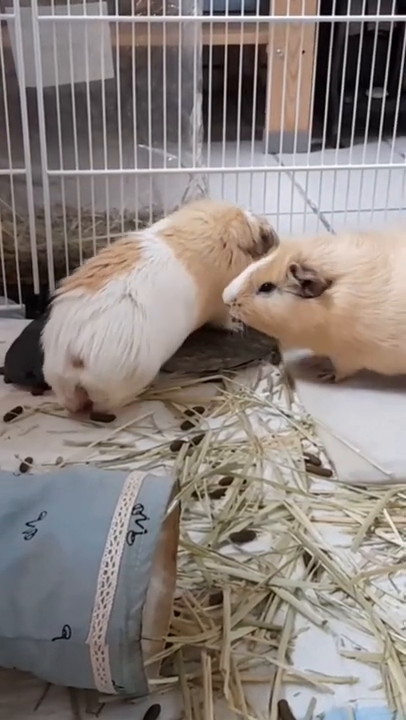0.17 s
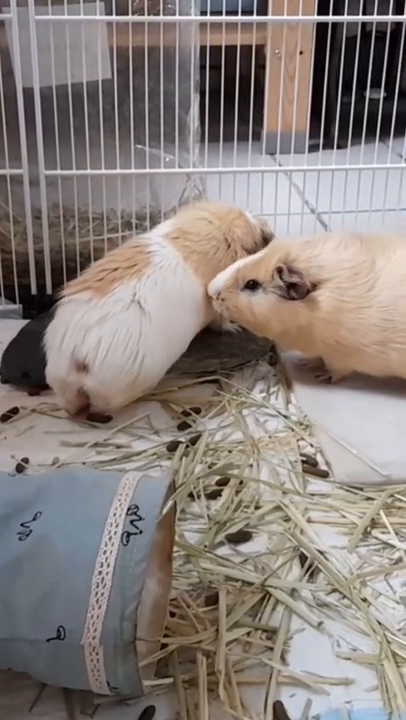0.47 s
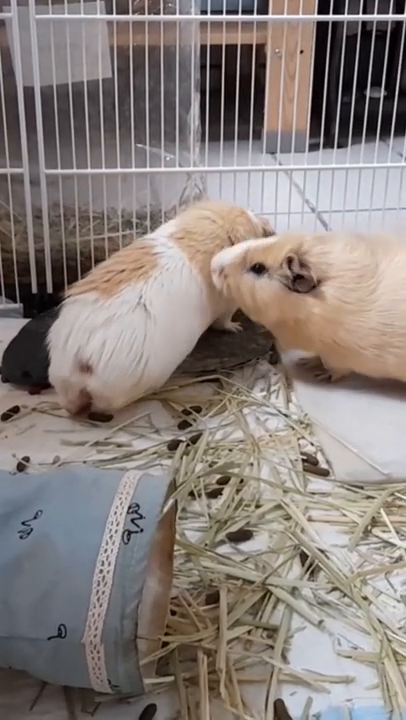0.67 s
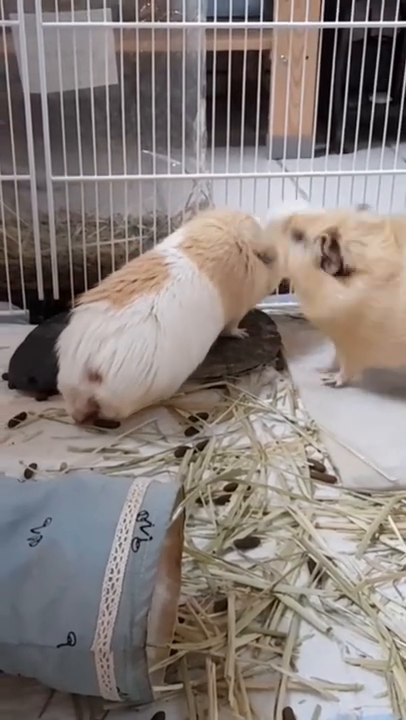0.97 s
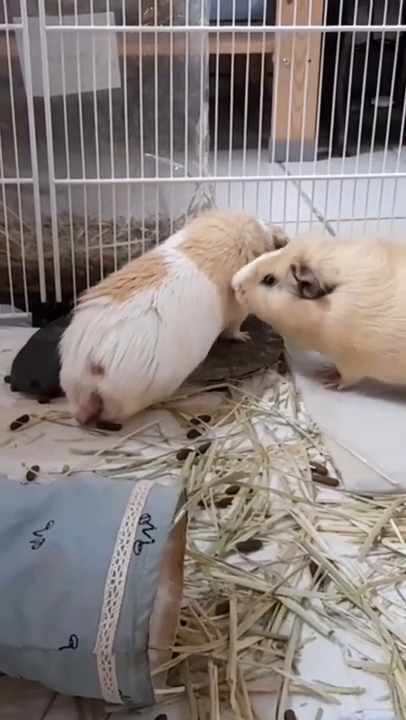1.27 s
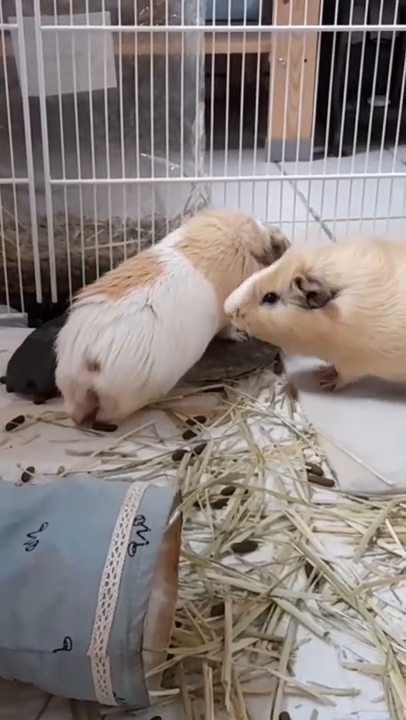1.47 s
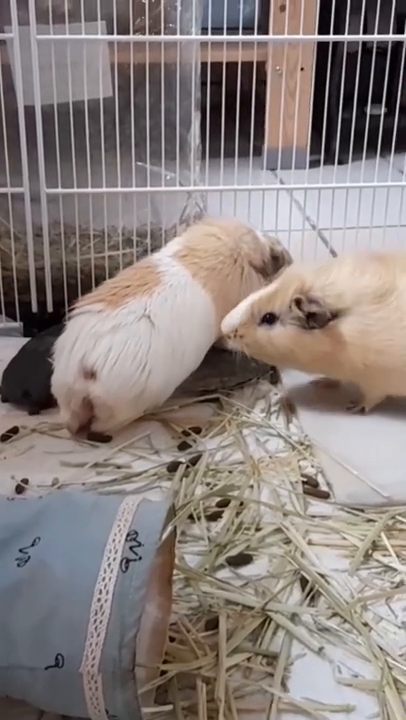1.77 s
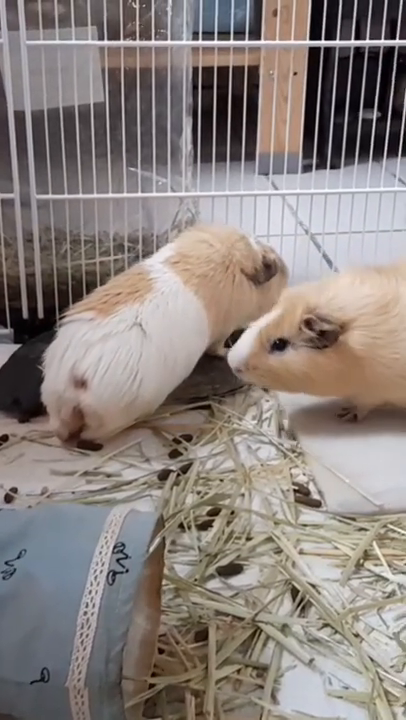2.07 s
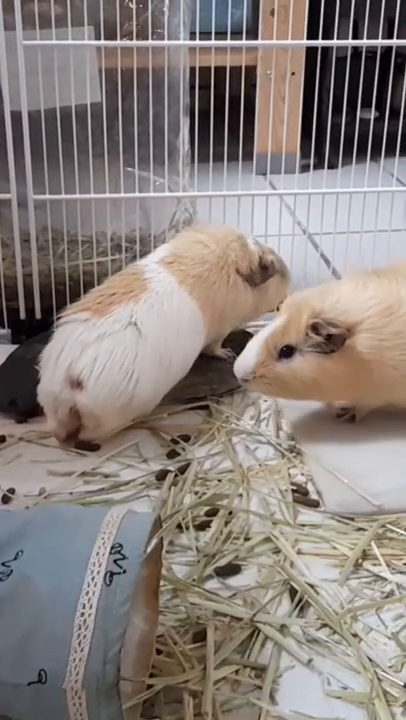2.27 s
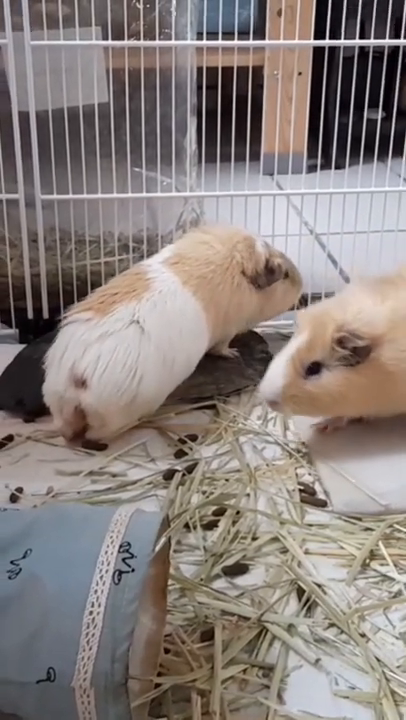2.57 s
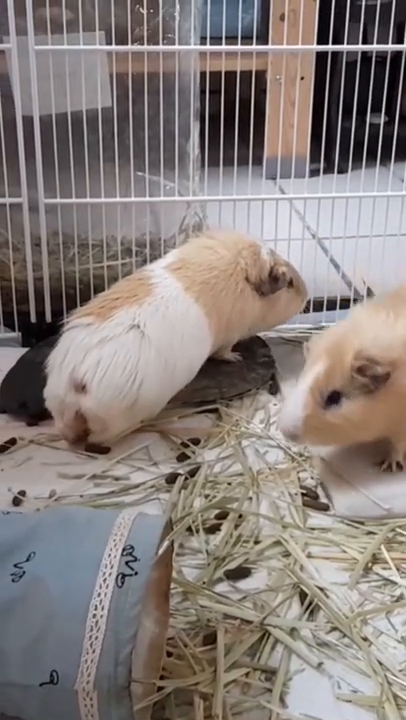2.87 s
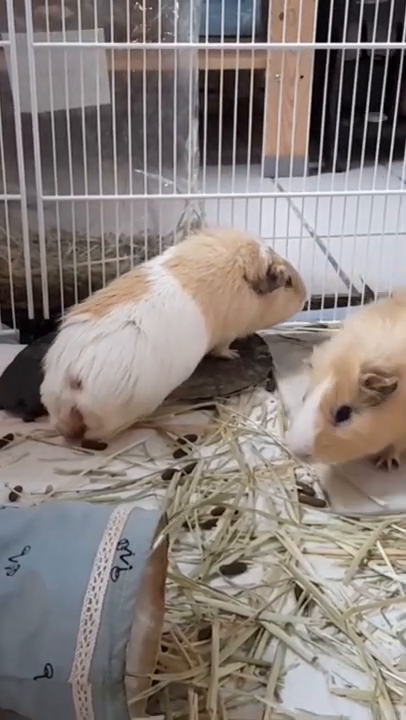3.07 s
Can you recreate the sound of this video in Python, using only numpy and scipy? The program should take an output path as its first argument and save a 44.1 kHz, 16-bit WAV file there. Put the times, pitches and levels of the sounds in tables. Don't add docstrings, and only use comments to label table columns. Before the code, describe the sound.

Guinea pig rumbling purr, rapid pulsing throbs with a short pause, hay rustles and soft hiss.

```python
import sys
import numpy as np
from scipy import signal
from scipy.fft import rfft, irfft
from scipy.io import wavfile
from scipy.ndimage import uniform_filter1d

SR = 44100
rng = np.random.default_rng(int(sys.argv[2]) if len(sys.argv) > 2 else 0)


def file_out(sig):
    cols = np.atleast_2d(sig).T
    lim = np.clip(cols, -1, 1)
    pcm = np.round(lim * 32767).astype(np.int16)
    wavfile.write(sys.argv[1], SR, pcm)


def voltage_ratio(decibels):
    exponent = np.asarray(decibels, float) / 20
    return 10 ** exponent


N = 141561


def ports(left_db, right_db):
    return voltage_ratio([[left_db], [right_db]])


def evened(x):
    return x / np.sqrt(np.mean(x ** 2) + 1e-20)


def read(points, hz, axis=1):
    table = np.transpose(points)
    return np.interp(np.log(hz + 1), np.log(table[0] + 1), table[axis])


def read_ports(points, hz):
    return np.array([read(points, hz, axis=1), read(points, hz, axis=2)])


def resonate(x, hz, width_hz):
    pole = np.exp((2j * hz - width_hz) * np.pi / SR)
    return 2 * signal.lfilter([1 - abs(pole)], [1, -pole], x + 0j).real


def bell(t, width_s):
    return np.exp(-(t / width_s) ** 2 / 2)


def add(mix, start_s, sound):
    at = round(start_s * SR)
    part = mix[:, max(at, 0):at + sound.shape[1]]
    part += sound[:, max(-at, 0):][:, :part.shape[1]]


def wash(colour_db, same, patchy_db, swell_db, size):
    frames = 4 * N // size + 5
    hz = np.fft.rfftfreq(size, 1 / SR)
    a, b, c, d, patch = rng.standard_normal((frames, len(hz), 5)).T
    patch = uniform_filter1d(patch, size=12, axis=0)
    patch = evened(uniform_filter1d(patch, size=8, axis=1))
    swell = evened(uniform_filter1d(rng.standard_normal(frames), size=20))
    alike = np.clip(read(same, hz), -1, 1)[:, None]
    left = a + 1j * b
    right = alike * left + np.sqrt(1 - alike ** 2) * (c + 1j * d)
    level_db = colour_db(hz)[:, None] + patchy_db * patch + swell_db * swell
    spectra = np.array([left, right]) * voltage_ratio(level_db)
    return evened(signal.istft(spectra, nperseg=size, noverlap=3 * size // 4)[1][:, :N])


def air():
    # pitch_hz, level_db (per Hz)
    air_colour = [(25, -40), (45, -30), (70, -16), (150, -18.5), (195, -27.5), (400, -22.5), (650, -35.5),
                  (1600, -57.5)]
    # pitch_hz, width_hz, lift_db
    modes = [(67.3, 6.7, 3), (96, 5.9, 5), (145.4, 2.9, 5.5)]
    # pitch_hz, correlation (0 to 1)
    air_same = [(60, 0.81), (200, 0.72), (640, 0.72), (1400, 0.028)]

    def colour(hz):
        lift = sum(voltage_ratio(db) / (1 + (2 * (hz - mode_hz) / width_hz) ** 2) for mode_hz, width_hz, db in modes)
        rolloff_db = 30 * np.log2(np.maximum(hz / 1600, 1))
        return read(air_colour, hz) - rolloff_db + 20 * np.log10(1 + lift)

    return voltage_ratio(-49.5) * wash(colour, air_same, patchy_db=0.0, swell_db=3.84, size=8192)


def hum():
    # pitch_hz, left_db, right_db
    lines = [(119.7, -56, -61), (239.9, -51.5, -51.5)]
    t = np.arange(N) / SR
    out = np.zeros((2, N))
    for hz, left_db, right_db in lines:
        waver_db = evened(uniform_filter1d(rng.standard_normal(N), size=4000))
        line = np.sqrt(2) * np.sin(2 * np.pi * (hz * t + rng.random()))
        out += ports(left_db, right_db) * voltage_ratio(waver_db) * line
    return out


def hiss():
    # pitch_hz, level_db (per Hz)
    hiss_colour = [(880, -26), (1500, -7.5), (1690, -6), (3110, -15), (6390, -16.5), (7120, -16.5),
                   (8000, -16), (14800, -7), (15400, -12.5)]
    # pitch_hz, correlation (0 to 1)
    hiss_same = [(2000, 0.015), (4500, 0.013), (8000, 0.89), (14900, 0.95)]

    def colour(hz):
        return read(hiss_colour, hz) - 12 * np.log2(np.maximum(1500 / (hz + 1), 1))

    return voltage_ratio(-70) * wash(colour, hiss_same, patchy_db=0.5, swell_db=-1.0, size=1024)


def knocks():
    # peak_s, level_db, pitch_hz
    floor_knocks = [(0.055, -42.5, 95), (0.085, -36, 80), (0.335, -41.5, 83), (0.557, -41, 66.4),
                    (0.586, -34.5, 80.4), (0.693, -39, 69.5), (0.722, -47, 83), (0.946, -40, 76.6),
                    (1.164, -38, 77.5), (1.241, -43, 64.6), (1.447, -42, 84), (1.553, -48, 92),
                    (2.105, -36.5, 72.4), (2.195, -37.5, 95), (2.24, -39.5, 83), (2.32, -37, 74.5),
                    (2.483, -41.5, 87.5), (2.564, -39.5, 89), (3.062, -38.5, 96), (3.167, -37, 81.5),
                    (0.29, -41, 84), (0.429, -42, 77), (0.799, -43.5, 66), (1.03, -40.5, 79),
                    (1.079, -45.5, 75), (1.29, -42.5, 75), (1.506, -54, 103), (1.692, -47, 65.5),
                    (1.736, -36.5, 72.4), (1.792, -44, 75), (1.95, -41, 93), (2.04, -42, 70),
                    (2.392, -42, 80), (2.63, -39.5, 100), (2.731, -40, 72), (2.799, -44, 70),
                    (3.001, -47, 70)]
    out = np.zeros((2, N))
    t = np.arange(-2000, 2000) / SR
    for peak_s, db, hz in floor_knocks:
        knock = bell(t, 0.01) * np.cos(2 * np.pi * hz * t)
        add(out, peak_s + t[0], ports(db - 5, db + 1) * knock)
    return out


def room(x):
    # pitch_hz, t60_s
    decay = [(200, 0.81), (600, 0.49), (1500, 0.7), (8000, 0.27)]
    gap_s, length, spacing = 0.008, SR // 2, 20
    taps = np.zeros((2, length))
    grid = np.arange(0, length - spacing, spacing)
    places = grid + rng.integers(0, spacing, (2, len(grid)))
    np.put_along_axis(taps, places, rng.choice([-1., 1.], (2, len(grid))), 1)
    taps *= np.clip(np.arange(length) / SR / gap_s - 1, 0, 1)
    hz, t, z = signal.stft(taps, SR, nperseg=512)
    tail = signal.istft(z * voltage_ratio(-60 * t / read(decay, hz)[:, None]), SR, nperseg=512)[1]
    eased = x * np.minimum(np.arange(N) / SR / 0.004, 1) ** 2
    return signal.fftconvolve(eased, tail / np.linalg.norm(tail[0]), axes=1)[:, :N]


def rustle():
    # start_s, rise_s, level_db, t60_s, tilt_db (per octave)
    moves = [
        (.963, 0.017, -53.5, 0.12, -4),
        (1.002, 0.0044, -70, 0.075, -7),
        (1.037, 0.033, -67, .5, -0.5),
        (2.23, .07, -83, .6, -3),
        (3.1, 0.005, -53.5, 0.04, 4),
        (3.108, 0.027, -66, .5, 4),
    ]
    # pitch_hz, level_db (per Hz)
    hay = [(1200, -15), (2200, -5.5), (4200, -4.5), (6800, 7), (8000, -0.5), (10700, 2), (13500, 3),
           (16000, 0.5)]
    same, snaps_per_s, spread_db = 0.3, 16000, 1.1
    t = np.arange(N) / SR
    hz = np.fft.rfftfreq(N, 1 / SR)
    strength = voltage_ratio(spread_db * rng.exponential(1, (2, N)))
    struck = rng.random((2, N)) < snaps_per_s / SR
    left, other = rng.standard_normal((2, N)) * strength * struck
    snaps = rfft(np.array([left, same * left + np.sqrt(1 - same ** 2) * other]))
    snaps *= voltage_ratio(read(hay, hz) - 7.9 * np.log2(np.maximum(1200 / (hz + 1), 1)))
    out = np.zeros((2, N))
    for start_s, rise_s, db, t60_s, tilt_db in moves:
        rise = np.clip((t - start_s) / rise_s, 0, 1) ** 0.23
        fall_db = 60 * np.maximum(t - start_s - rise_s, 0) / t60_s
        tilt = voltage_ratio(tilt_db * np.log2((hz + 100) / 6000))
        out += voltage_ratio(db - fall_db) * rise * evened(irfft(snaps * tilt, N))
    return out


def chest_beats(t, top_hz, lead_db):
    beat_s, lead_s, lead_pitch, climb_per_s = 0.0047, 0.018, 0.9396, 3.3
    heard = t - np.array([[0.0003], [0]])
    strong = bell(t, beat_s) * np.cos(2 * np.pi * top_hz * heard * (1 + climb_per_s * t))
    lead_turns = lead_pitch * top_hz * heard + rng.random()
    weak = bell(t + lead_s, beat_s) * np.cos(2 * np.pi * lead_turns)
    return strong + voltage_ratio(lead_db) * weak


def throb(peak_s, effort_db, top_hz, lead_db):
    # time_s, lift_db, rasp_db (per octave above rasp_hz)
    mouth = [(0, 10, -5), (.17, -1, -15), (.45, 3, 4.5), (.9, -2.5, 9.5), (1.4, -10.5, -10), (1.62, 0, 1.5),
             (2.1, 2.5, 0.5), (2.4, -6, -19), (2.65, -2, -3), (3.2, -7, -2)]
    # pitch_hz, left_db, right_db
    throat = [(259, -25, -31.5), (363, -4.5, -0.5), (634.5, -12, -10.5), (854, -27, -29), (996, -27.5, -25),
              (1417, -36.5, -34.5), (1980, -51, -44.5), (2860, -67, -71.5)]
    # pitch_hz, level_db
    breath = [(400, -5), (600, -16), (850, 0), (2000, 1)]
    build_s, cut_s, build_db, second_build_db = 0.021, 0.0028, -6, -20.5
    overshoot, glide, wobble, rough = 1.04, 0.17, 0.026, 0.091
    rasp_hz, port_turns, partials = 1180, 0.068, 10

    t = np.arange(-2000, 1000) / SR
    shake = evened(uniform_filter1d(rng.standard_normal((3, len(t))), size=150))
    late = t + np.array([[0.0055], [0.0022]])
    build = np.clip(-late / build_s, 0, 2)
    onset = np.clip(1.59 * (1.35 - build), 0, 1)
    level = voltage_ratio(build_db * build) * onset * bell(np.maximum(late, 0), cut_s)

    hz = top_hz * (overshoot - glide * np.clip(-t / build_s, 0, 2) + wobble * shake[0])
    turns = np.cumsum(hz) / SR
    time_s, lift_db, rasp_db = np.transpose(mouth)
    lift_db = np.interp(peak_s, time_s, lift_db)
    rasp_db = np.interp(peak_s, time_s, rasp_db)

    def colour_db(f):
        return read_ports(throat, f) + rasp_db * np.log2(np.clip(f / rasp_hz, 1, 2))

    voice = np.zeros((2, len(t)))
    for k in range(1, partials + 1):
        start = rng.random() + port_turns * (k - 1) * rng.standard_normal((2, 1))
        partial_db = colour_db(k * hz) + lift_db * min(k - 1, 2) / 2
        if k < 3:
            partial_db = partial_db + second_build_db * build
        voice += voltage_ratio(partial_db) * np.cos(2 * np.pi * (k * turns + start))

    f = np.fft.rfftfreq(len(t), 1 / SR)
    puff = rfft(rng.standard_normal((2, len(t))))
    puff = irfft(puff * voltage_ratio(colour_db(f) + read(breath, f)) * (f > 200), len(t))
    voice = voice * (1 + rough * shake[1:]) + voltage_ratio(lift_db) * np.sqrt(SR / 4 / top_hz) * puff
    both = np.concatenate([level * voice, chest_beats(t, top_hz, lead_db)])
    return peak_s + t[0], np.sqrt(2) * voltage_ratio(effort_db - 4) * both


def purr():
    # peak_s, effort_db, top_pitch_hz, lead_beat_db (against the peak)
    first_run = [(0.004, -27.5, 298.8, 4), (0.075, -35, 280.6, -16), (0.135, -31.5, 323, -8),
                 (0.207, -29.5, 300.5, -31), (0.273, -31, 300.5, -23), (0.334, -30, 294.6, -13),
                 (0.399, -31, 286.8, -5), (0.462, -29, 294.7, -5.5), (0.528, -30, 274.6, -4.5),
                 (0.591, -30.5, 308.6, -5.5), (0.656, -29, 308.2, -9), (0.721, -31, 284.8, -0.5),
                 (0.787, -28.5, 294, -1.5), (0.856, -29, 289.7, -12), (0.917, -29, 307.6, -8.5),
                 (0.975, -34, 303.7, -5), (1.027, -43, 285.6, -2)]
    second_run = [(1.376, -35, 307, -11), (1.44, -33.5, 302, -17), (1.504, -32, 290, -33),
                  (1.568, -32.5, 294.2, -7.5), (1.634, -30, 286.6, -8), (1.698, -29.5, 296.3, -7.5),
                  (1.767, -30, 294.5, -5), (1.834, -31.5, 291, -27), (1.902, -31, 287.1, -14),
                  (1.967, -29.5, 288, -5), (2.035, -30, 297, -2.5), (2.1, -29, 299.9, -6.5),
                  (2.17, -30, 286.2, -3), (2.234, -27.5, 318.6, -13), (2.303, -28, 298.6, -11.5),
                  (2.38, -27, 305, -24), (2.449, -30, 301, -23), (2.514, -29.5, 304.6, -12),
                  (2.583, -27.5, 294, -20), (2.654, -29.5, 291.6, -9.5), (2.725, -29.5, 289.3, -9.5),
                  (2.797, -30, 288.3, -11), (2.874, -31, 312, -10), (2.947, -30, 304, -15),
                  (3.019, -30, 304.3, -6.5), (3.092, -30, 302.6, -9.5), (3.159, -28, 288, -11)]
    # pitch_hz, width_hz, left_db, right_db
    hollows = [(772, 40, 4, 1.5), (925, 40, -3, 4), (1075, 70, 3, -3), (1140, 50, -4, 3), (1330, 90, 3, 3),
               (1520, 90, -4, -4), (2040, 120, 1.5, 1.5)]
    out = np.zeros((4, N))
    for row in list(first_run) + list(second_run):
        add(out, *throb(*row))
    throat, beats = out[:2], out[2:]
    chest = ports(-14, 1.5) * beats + ports(-14, 0) * resonate(beats, hz=271, width_hz=7)
    voice = throat.copy()
    for hz, width_hz, left_db, right_db in hollows:
        ring = resonate(resonate(throat, hz, width_hz), hz, width_hz)
        voice += ports(left_db, right_db) * ring
    return voice, chest


def scene():
    voice, chest = purr()
    near = voice + ports(-1.5, 0) * rustle()
    echoes = room(voltage_ratio(-5.5) * near + voltage_ratio(-14) * chest)
    return near + chest + echoes + knocks() + air() + hum() + hiss()


def top_cut(x):
    return signal.sosfilt(signal.butter(12, 15500, fs=SR, output="sos"), x)


def record(dry):
    return top_cut(dry)


dry = scene()
out = record(dry)
file_out(out)
```